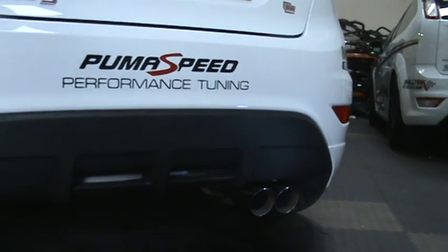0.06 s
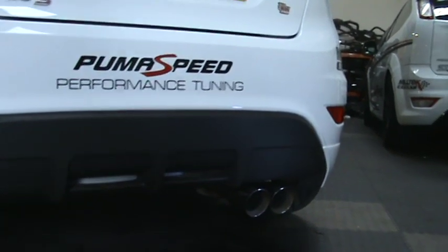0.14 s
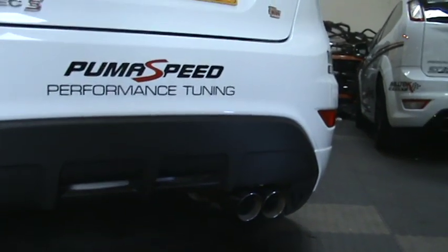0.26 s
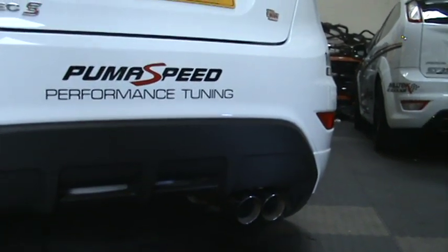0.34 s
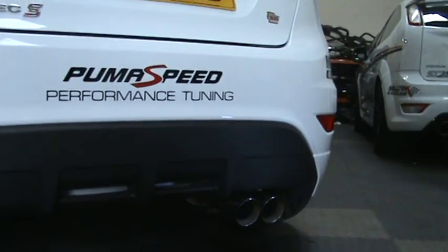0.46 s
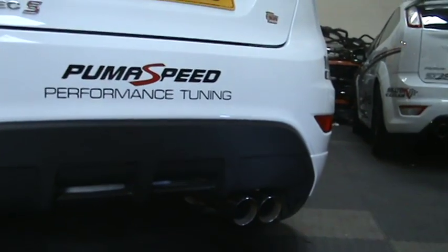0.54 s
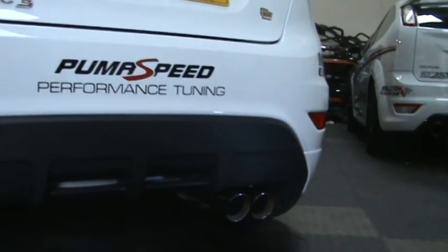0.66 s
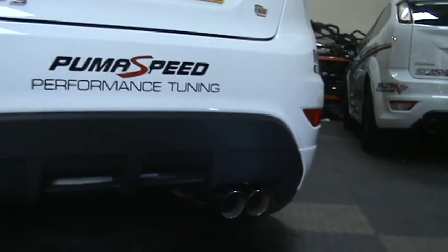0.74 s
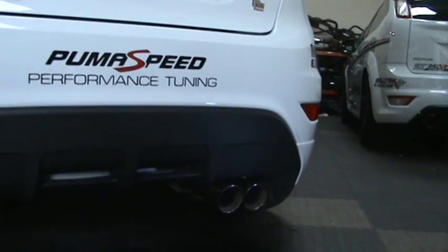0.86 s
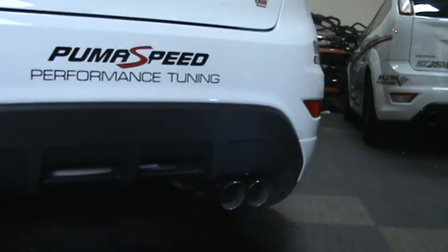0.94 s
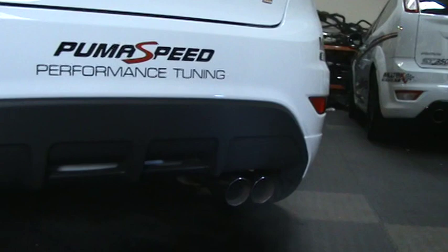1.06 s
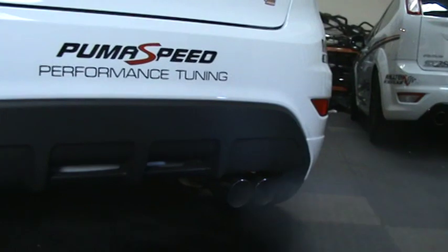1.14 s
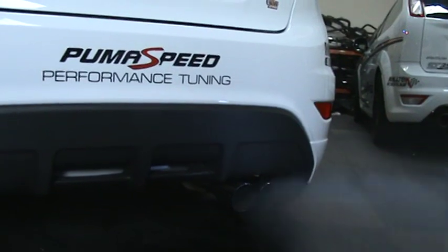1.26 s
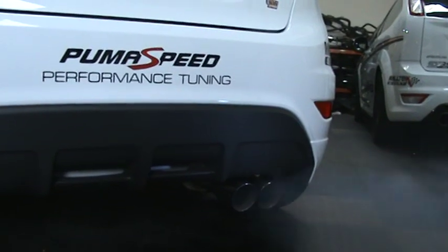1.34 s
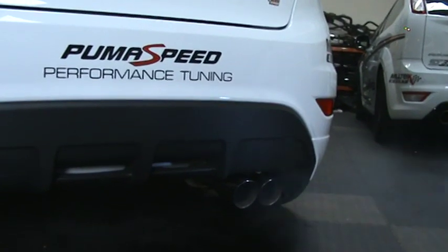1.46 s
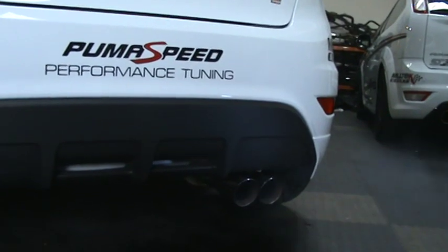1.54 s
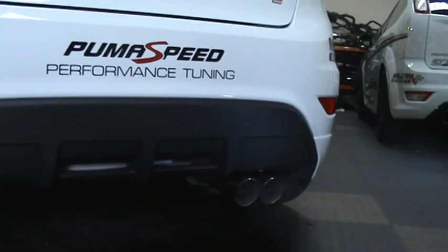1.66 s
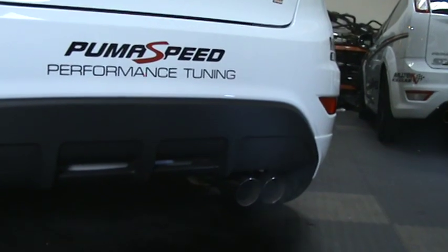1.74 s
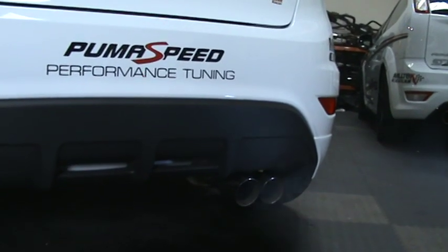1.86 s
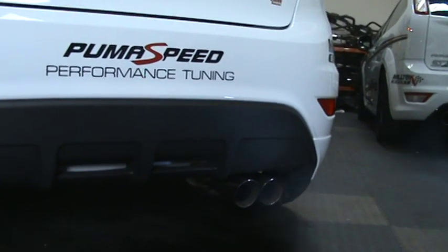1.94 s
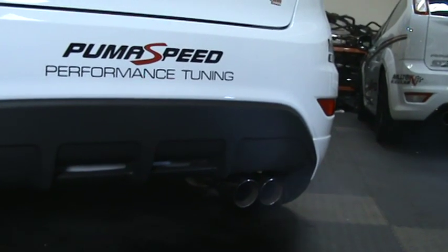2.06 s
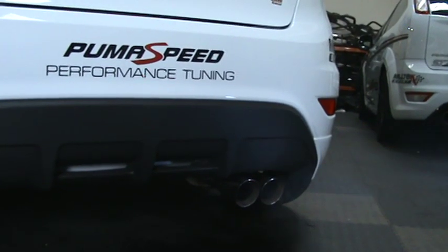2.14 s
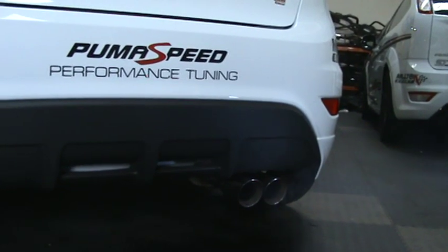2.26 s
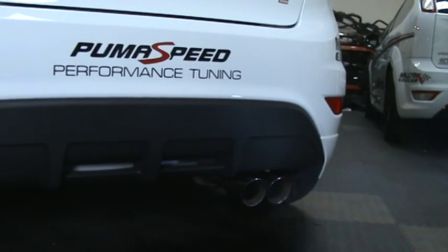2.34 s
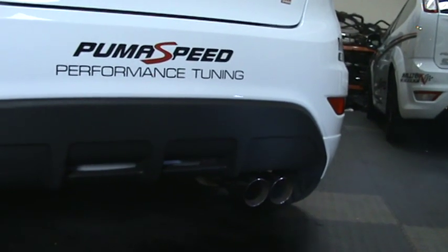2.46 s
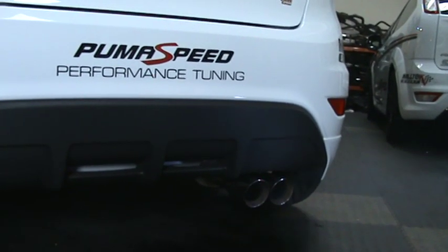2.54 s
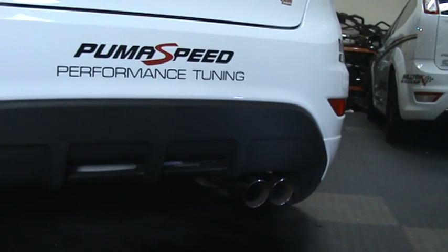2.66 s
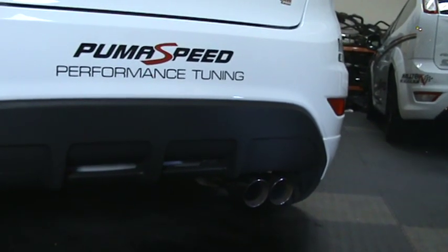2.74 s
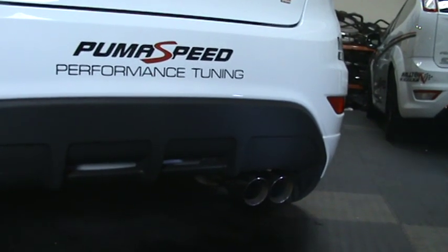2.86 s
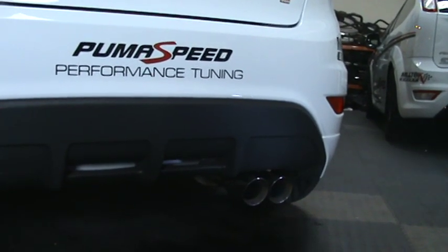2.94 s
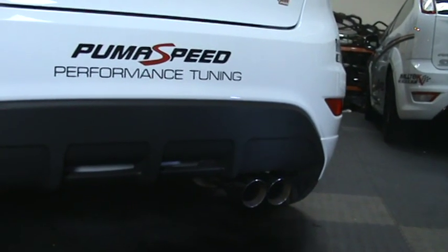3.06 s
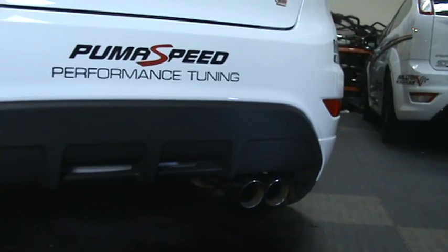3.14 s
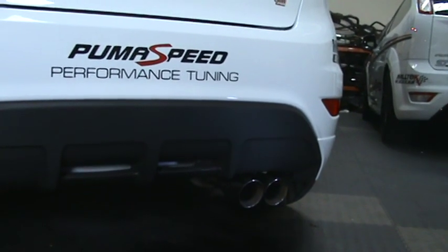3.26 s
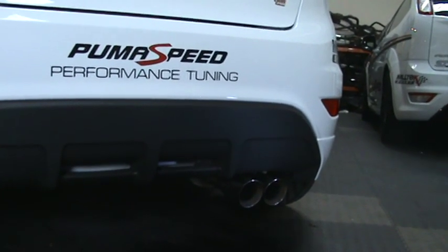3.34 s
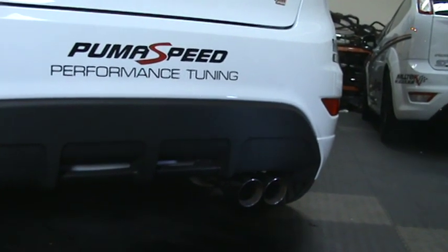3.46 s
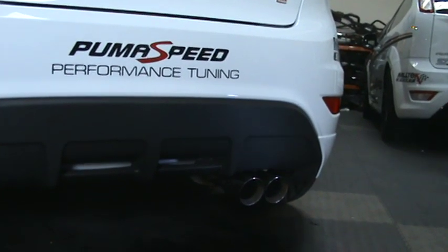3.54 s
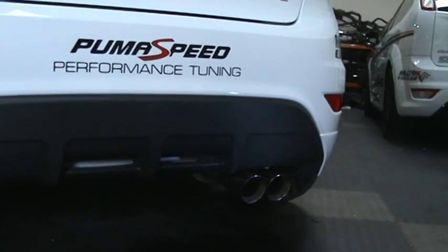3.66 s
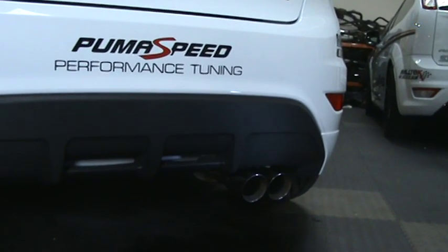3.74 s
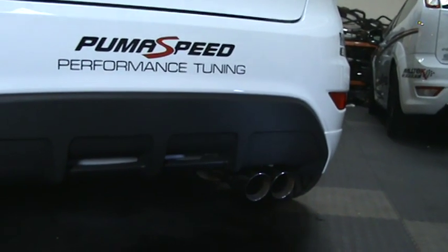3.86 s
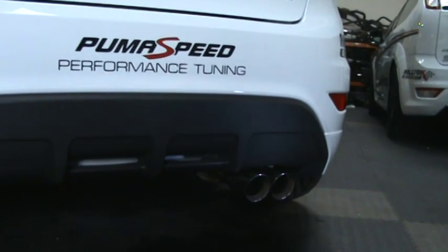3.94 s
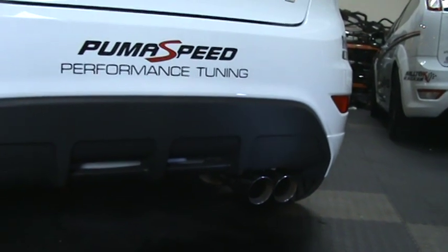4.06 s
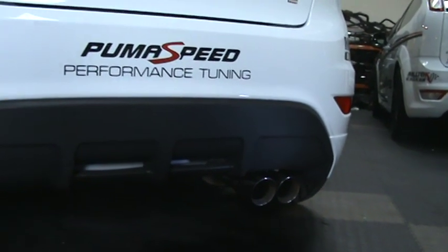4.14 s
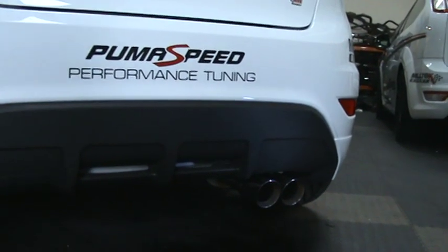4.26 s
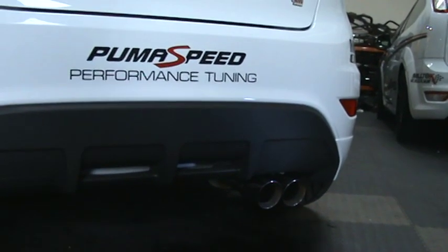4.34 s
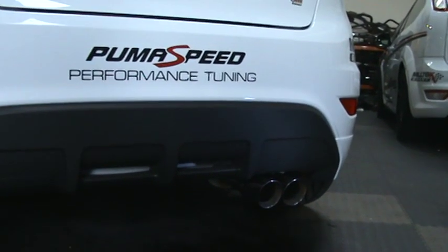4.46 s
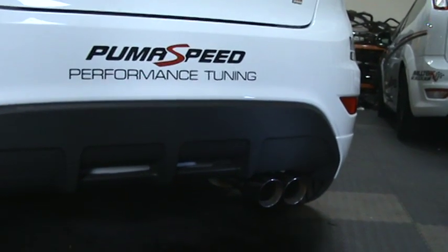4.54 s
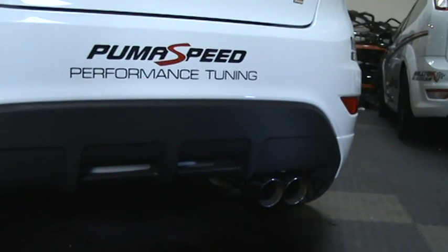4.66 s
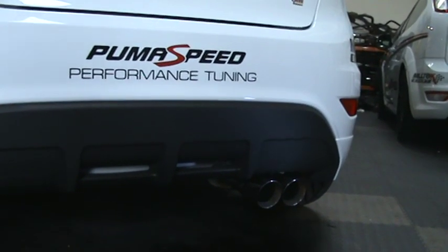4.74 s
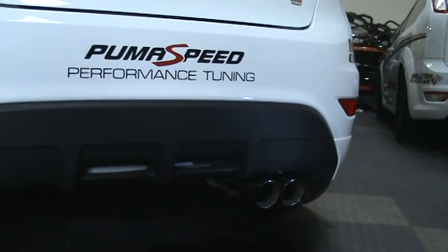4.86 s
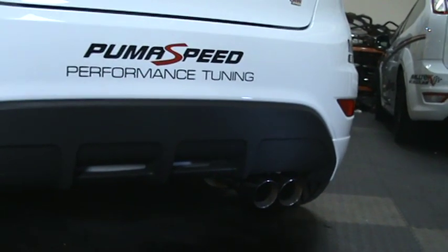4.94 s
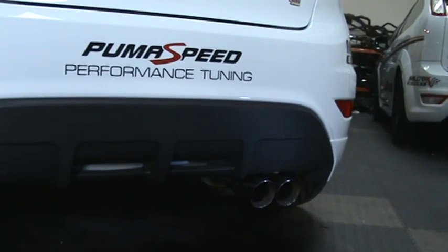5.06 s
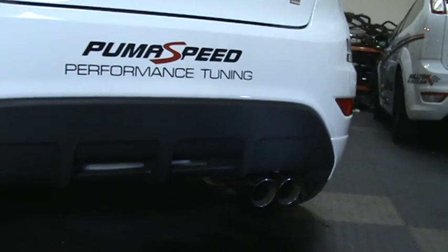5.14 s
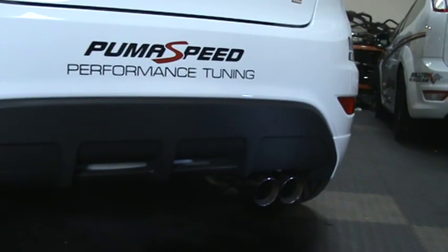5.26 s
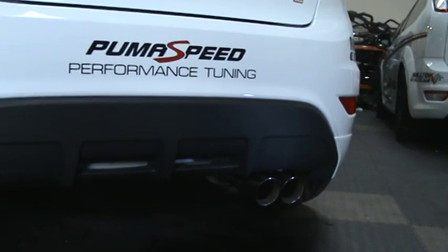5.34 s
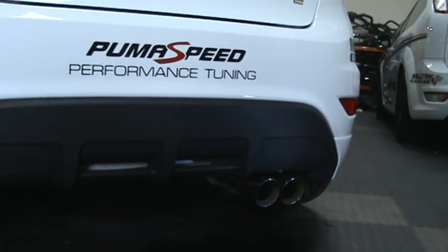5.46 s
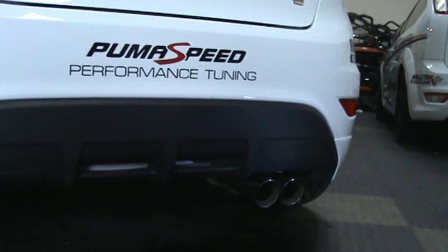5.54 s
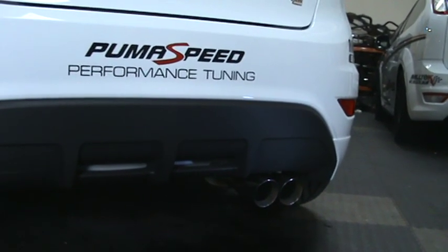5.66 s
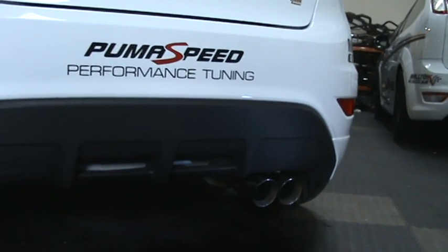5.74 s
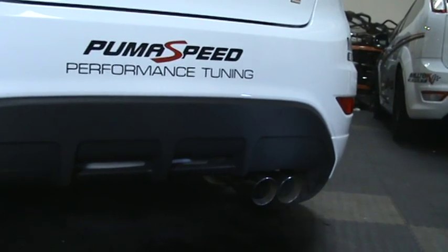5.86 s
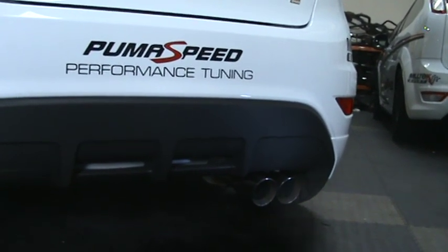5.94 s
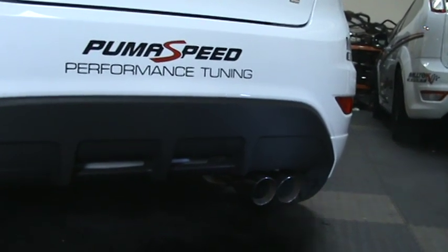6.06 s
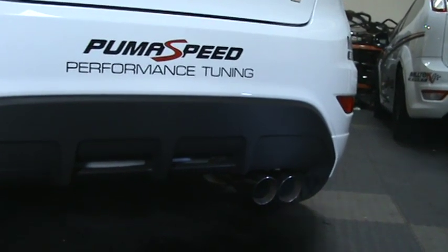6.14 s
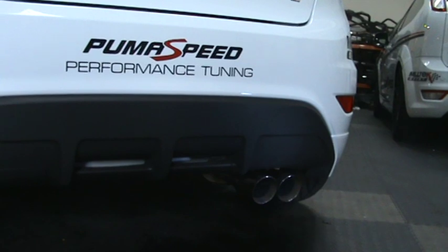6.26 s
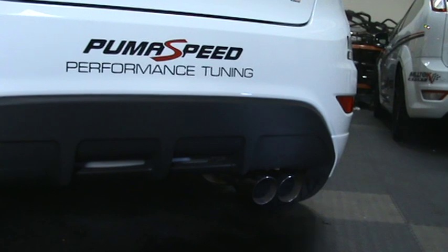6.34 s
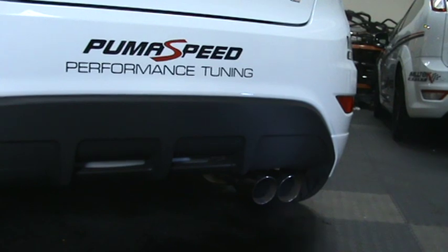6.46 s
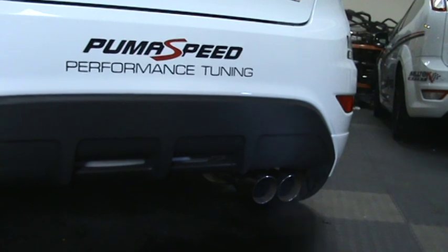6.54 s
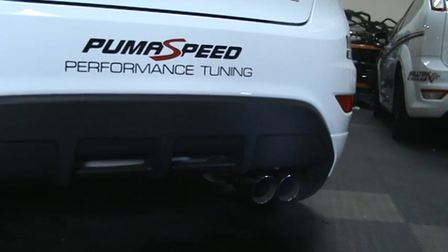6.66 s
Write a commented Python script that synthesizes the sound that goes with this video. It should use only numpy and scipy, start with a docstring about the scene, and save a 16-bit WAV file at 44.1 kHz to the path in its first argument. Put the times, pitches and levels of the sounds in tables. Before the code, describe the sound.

A four-cylinder petrol engine runs down, is blipped to a loud raspy peak, pops and burbles down to quiet idle, then is blipped again.

```python
"""Car with a sport exhaust

A four-cylinder petrol car in a workshop, heard from behind the tail pipes. It runs down, is blipped up to
a high raspy speed, pops and burbles down to idle, then is blipped again and ends while slowing down.
The note is a stack of multiples of the firing rate; burble and pop thumps are blows that ring the pipes.
Clatter, gas jet, rasp, pop cracks and whistle are shaped noise; a short hall answers the cracks.
"""
import sys
import numpy as np
from scipy import signal
from scipy.fft import rfft, irfft, next_fast_len
from scipy.io import wavfile
from scipy.ndimage import map_coordinates

SR = 44100
rng = np.random.default_rng(int(sys.argv[2]) if len(sys.argv) > 2 else 0)


def bounce(signal):
    """Save signal as a 16-bit WAV file at the path given by the first command-line argument."""
    frames = np.transpose(np.atleast_2d(signal))
    limited = np.clip(frames, -1, 1)
    pcm = np.round(limited * 32767).astype(np.int16)
    wavfile.write(sys.argv[1], SR, pcm)


N = 295896  # length in samples


def amp(db):
    """Gain of a level in dB."""
    return 10 ** (np.asarray(db) / 20)


def unit(x):
    """Scale a sound to an rms of 1."""
    return x / np.sqrt(np.mean(x ** 2) + 1e-20)


def along(points, hz):
    """Read a curve of (Hz, value) points on a log frequency axis."""
    f, v = np.transpose(points)
    return np.interp(np.log(hz + 1), np.log(f + 1), v)


def curves(rows):
    """Join the rows over time: one value per sample for each column after the time."""
    seconds, *columns = np.transpose(rows)
    return [np.interp(np.arange(N) / SR, seconds, column) for column in columns]


def by_speed(rows, rate):
    """Look up the rows by firing rate: one value per sample for each column after the rate."""
    hz, *columns = np.transpose(rows)
    return np.array([np.interp(rate, hz, column) for column in columns])


def ramp(start, length):
    """A straight rise: 0 before start, 1 after start + length, both in seconds."""
    return np.clip((np.arange(N) / SR - start) / length, 0, 1)


def wobble(rate):
    """A smooth random curve with this many random points a second."""
    knots = rng.standard_normal(int(N * rate / SR) + 4)
    return map_coordinates(knots, [np.arange(N) * rate / SR])


def filtered(x, response):
    """Multiply the spectrum of x by a complex response of frequency."""
    m = next_fast_len(N + SR // 2)  # spare room so that ringing does not wrap round
    return irfft(rfft(x, m) * response(np.fft.rfftfreq(m, 1 / SR)), m)[..., :N]


def causal(points):
    """The response with this spectrum that rings only after the blow (minimum phase)."""
    grid = np.linspace(0, SR / 2, 2 ** 15 + 1)
    cepstrum = irfft(np.log(amp(along(points, grid)) + 1e-4))
    half = len(cepstrum) // 2
    cepstrum[1:half] *= 2
    cepstrum[half + 1:] = 0
    response = np.exp(rfft(cepstrum))
    return lambda hz: np.interp(hz, grid, response)


def dying(x, t60):
    """Turn each impulse into a sudden rise and an exponential fall of 60 dB in t60 seconds."""
    return signal.lfilter([1], [1, -amp(-60 / (t60 * SR))], x)


# How alike left and right are in the noises. Each row: frequency in Hz, likeness (1 is the same).
LIKENESS = [(300, 1), (700, 0.52), (1500, 0.86), (5000, 0.88), (15000, 0.82)]


def rush(spectrum, shape):
    """Stereo noise of rms 1 under the envelope shape, with left and right partly alike."""
    turn = lambda hz: np.arccos(np.clip(along(LIKENESS, hz), -1, 1)) / 2
    pair = rng.standard_normal((2, N)) * shape
    mid, side = filtered(pair, lambda hz: causal(spectrum)(hz) * [np.cos(turn(hz)), np.sin(turn(hz))])
    return unit(np.array([mid + side, mid - side]))


# How fast the engine turns. Each row: time in seconds, firings per second in Hz.
ENGINE_SPEED = [(0, 73.8), (.27, 71.5), (.43, 64.55), (.62, 54.8), (.8, 51.9), (.83, 58.1), (.91, 73.86),
                (1.03, 102.7), (1.09, 123.5), (1.19, 153.2), (1.24, 162.9), (1.31, 170.9), (1.4, 174.1),
                (1.66, 162.1), (1.92, 144.8), (2.15, 129.8), (2.49, 107.9), (2.8, 91.97), (3.07, 79.92),
                (3.37, 63.82), (3.55, 52.85), (4.18, 39.12), (4.47, 36.47), (4.73, 35.1), (5.45, 34.6),
                (5.55, 35.53), (5.624, 43.24), (5.73, 62.67), (5.782, 75.9), (5.876, 98.5), (5.982, 121.8),
                (6.064, 127.3), (6.12, 130.1), (6.2, 126.5), (6.414, 115.2), (6.71, 100.1)]


def firings():
    """Firing rate with a slight wobble, running count of firings and the sample of each one."""
    rate = curves(ENGINE_SPEED)[0] * (1 + 0.00416 * wobble(25))
    turns = np.cumsum(rate) / SR
    return rate, turns, np.flatnonzero(np.diff(np.floor(turns)))


# Throttle blips. Each row: time it opens in seconds, time it shuts in seconds.
THROTTLE_BLIPS = [(.78, 1.355), (5.57, 6.03)]
OPENING_S, CLOSING_S = 0.041, 0.18  # how long the note takes to follow the throttle


def throttle(lead, opening, closing):
    """Throttle opening, 0 to 1, as a sound follows it: lead, rise and fall times in seconds."""
    return sum(ramp(opens - lead, opening) - ramp(shuts, closing) for opens, shuts in THROTTLE_BLIPS)


# Sound with the throttle open. Each row: firing rate in Hz, strength of the four lowest multiples in dB
# against the silencer's level, then relative dB for higher multiples, burble, engine bay, gas jet, rasp.
OPEN_THROTTLE = [(40.26, -0.5, -22.5, -33, -46, -59, -53), (49.7, -5, -20.5, -31, -43, -49, -48),
                 (61.5, 1.5, -18.5, -22.5, -39, -49, -40.5), (81, -1, -14, -22, -37, -46.5, -44),
                 (94, -0.5, -14.5, -24, -35, -52, -46), (108, -1.5, -22, -37, -34.5, -45, -28),
                 (118, -1.5, -22.5, -41, -30, -37.5, -31.5), (148, -1.5, -23.5, -36, -33, -39.5, -33.5),
                 (180.9, -1.5, -19, -30, -26, -33, -29.5)]
# Note with the throttle shut. Each row: firing rate in Hz, first to fourth multiple in dB against the
# silencer's level, then higher multiples and burble in relative dB.
SHUT_THROTTLE_NOTE = [(41.85, -14, -21, -37, -35, -42, -40), (46.7, -9, -22, -18.5, -23, -41, -31.5),
                      (55.4, -10, -16.5, -17, -34, -37, -32), (70.3, -10, -9.5, -12.5, -36, -37, -30),
                      (78.7, -4, -24, -10, -15, -34.5, -23.5), (85, 0.5, -8, -6, -23.5, -47, -39),
                      (94.15, -0.5, -9, -14, -13.5, -37, -47), (106.36, -2.5, -12, -16, -29.5, -66, -35),
                      (129.65, 4, -4.5, -11, -1, -26.5, -33), (144.8, 3, 0, -5.5, -11, -23.5, -32),
                      (166.6, -1.5, -5.5, -0.5, -6.5, -29.5, -38), (173, 3, -15, 5.5, -19, -28, -41)]
# What the silencer lets through of the four lowest multiples. Each row: frequency in Hz, level in relative dB.
SILENCER_LEVEL = [(40, -28), (58, -24), (75, -20), (100, -15), (116, -16.5), (125, -22), (147, -15.5),
                  (174, -19.5), (205, -21), (240, -30.5), (300, -22.5), (335, -20), (400, -18.5),
                  (450, -24), (500, -35.5), (700, -30.5)]
# The note stumbles. Each row: middle in seconds, half length in seconds, change at the middle in dB.
NOTE_STUMBLES = [(0.058, 0.052, -18), (1.405, 0.045, -14), (1.545, 0.048, -9), (2.211, 0.036, -0.5),
                 (3.179, 0.021, -21), (6.125, 0.066, -5), (6.196, 0.026, -6)]
# Idle. Each row: time in seconds, then relative dB for the first to fourth multiple, the higher
# multiples and the burble.
IDLE_LEVELS = [(4.18, -37, -52, -48, -45.5, -46, -50), (4.47, -30, -46, -43, -39, -44.5, -52),
               (4.73, -36.5, -49, -49, -38, -46.5, -52), (5.1, -38, -44, -44, -34, -45, -48),
               (5.45, -35, -41, -44.5, -33.5, -45.5, -57)]
IDLE_HZ, IDLE_BLEND_HZ = 39.5, 2.7  # full idle at and below the first, blended in over the second above it
NOTCH_HZ, NOTCH_WIDTH_HZ, NOTCH_DB = 115.6, 1.6, -8  # the note thins near this rate, throttle shut


def levels():
    """Levels in dB of the four lowest multiples, the higher ones and the burble, from speed and throttle."""
    rate, t = curves(ENGINE_SPEED)[0], np.arange(N) / SR
    opened = throttle(0, OPENING_S, CLOSING_S)
    strength_db, high_db, burble_db = by_speed(OPEN_THROTTLE, rate)[:3]
    open_db = np.array([strength_db] * 4 + [high_db, burble_db])
    running = opened * open_db + (1 - opened) * by_speed(SHUT_THROTTLE_NOTE, rate)
    notch_db = (1 - opened) * NOTCH_DB * np.exp(-((rate - NOTCH_HZ) / NOTCH_WIDTH_HZ) ** 2)
    stumble_db = sum(db * np.clip(1 - abs(t - s) / half, 0, 1) for s, half, db in NOTE_STUMBLES)
    running[:4] += [along(SILENCER_LEVEL, k * rate) + notch_db + stumble_db for k in range(1, 5)]
    idling = (1 - opened) * np.clip((IDLE_HZ + IDLE_BLEND_HZ - rate) / IDLE_BLEND_HZ, 0, 1)
    return idling * np.array(curves(IDLE_LEVELS)) + (1 - idling) * running


def outlet(hz):
    """A pressure pulse leaves the pipe; an inverted copy follows after a trip back and forth in the tail pipe."""
    return np.exp(-2j * np.pi * hz * .0012) * (1 - .8 * np.exp(-2j * np.pi * hz * .0039))


# Tail pipe resonances that colour the higher multiples. Each row: frequency in Hz, level in relative dB.
TAIL_PIPES = [(170, -2.5), (210, -6.5), (245, -20), (310, -9.5), (400, -0.5), (460, -6.5), (520, -13),
              (600, -24), (700, -9), (780, -13), (860, -11.5), (1000, -14.5), (1400, -16.5), (1750, -10.5),
              (2500, -11), (3000, -40)]


def note(rate, turns, level_db):
    """Even firing makes multiples of the firing rate, timed by the outlet; the tail pipes colour high ones."""
    *low_db, high_db, _ = level_db
    tone = 0
    for k in range(1, 21):
        if k <= len(low_db):
            db = low_db[k - 1] + 0.69 * wobble(20)
        else:  # the higher the multiple, the weaker; all of these are less steady
            weaker_db = np.minimum(1.9, 200 / rate) * (k - len(low_db))
            db = high_db + along(TAIL_PIPES, k * rate) - weaker_db - 3.5 + 4 * wobble(30)
        tone = tone + amp(db) * np.cos(2 * np.pi * k * turns + np.angle(outlet(k * rate)))
    return np.sqrt(2) * tone


# Bursts of burble. Each row: time of the peak in seconds, level in relative dB, time to fall 60 dB in seconds.
BURBLE_BURSTS = [(.3, -22, 0.54), (.47, -34, .6), (1.355, -20, 0.73), (3.07, -22.5, 0.68), (3.27, -20, .8),
                 (4.1, -37, .5), (6.03, -23, 1)]
BURST_RISE_S = 0.041


def unevenness(burble_db):
    """Gain of the burble: what speed and throttle give, with the bursts added in power."""
    t = np.arange(N) / SR
    power = amp(burble_db) ** 2
    for s, db, t60 in BURBLE_BURSTS:
        fall_db = 60 * np.clip(t - s, 0, None) / t60
        power = power + (amp(db - fall_db) * ramp(s - BURST_RISE_S, BURST_RISE_S)) ** 2
    return np.sqrt(power)


# Unburnt fuel going off in the pipe. Each row: time in seconds, crack in relative dB, thump in relative dB.
FUEL_POPS = [(0.297, -48, -21), (0.326, -46, -18), (0.356, -48, -16.5), (0.468, -47, -27),
             (0.5347, -45, -17), (1.3472, -18.5, -18), (1.3555, -33, -29), (1.382, -20, -22),
             (3.0693, -21.5, -8), (3.1698, -38, -19), (3.2669, -45, -12.5), (3.2892, -19.5, -10),
             (3.3673, -43, -12), (3.5183, -33, -14), (3.5348, -49, -19), (3.6222, -42, -25),
             (3.6778, -38.5, -20), (4.0996, -59, -37), (5.6165, -29, -21), (5.6956, -30, -7),
             (6.044, -19, -5)]
# How the exhaust system rings under the burble. Each row: frequency in Hz, level in relative dB.
EXHAUST_SYSTEM = [(13, -33), (22, -7.5), (113, -3), (141, 9.5), (197, -11), (237, -30), (271, -32),
                  (325, -53), (385, -3), (418, -34), (486, -76.5), (657, -52), (844, -60), (903, -102),
                  (1200, -25), (1560, -91), (2640, -120)]


def burble(rate, at, burble_db):
    """Each firing is stronger or weaker than the mean and rings the system; pops are single round blows."""
    blows, thumps = np.zeros(N), np.zeros(N)
    blows[at] = rng.uniform(-1, 1, N // 100)[:len(at)] / np.sqrt(rate[at])
    for s, _, thump_db in FUEL_POPS:
        thumps[round(s * SR)] = amp(thump_db)
    rounded_outlet = lambda hz: outlet(hz) / (1 + 1j * hz / 300) ** 3  # treble taken off above 300 Hz
    peak = np.abs(filtered(np.eye(1, N)[0], rounded_outlet)).max()
    ringing = unit(filtered(blows, causal(EXHAUST_SYSTEM)))
    return unevenness(burble_db) * ringing + filtered(thumps, rounded_outlet) / peak


# Noises with the throttle shut. Each row: firing rate in Hz, then engine bay, gas jet and rasp in relative dB.
SHUT_THROTTLE_NOISE = [(36.9, -50, -106, -77), (50.9, -46.5, -59, -78), (56.3, -45, -56.5, -65),
                       (75.6, -43, -57, -55.5), (90.6, -40.5, -58.5, -46), (117.93, -34.5, -62, -58),
                       (130, -32, -46.5, -51.5), (135.5, -31, -46, -34.5), (145.4, -30.5, -39, -38),
                       (149.2, -29.5, -45, -40.5), (152, -30.5, -37.5, -37), (182, -25, -43, -34.5)]
FLOW_LEAD_S, FLOW_OPENING_S, FLOW_CLOSING_S = 0.039, 0.035, 0.18  # gas flow starts before the note
SPIT_DELAY_S = 0.21
RUNDOWN_DB, RUNDOWN_S = 5.5, 0.53  # extra engine bay noise still dying down from an earlier blip


def noise_levels():
    """Opening for the gas flow, and levels in dB of engine bay, jet and rasp, from speed and throttle."""
    rate = curves(ENGINE_SPEED)[0]
    opened = throttle(FLOW_LEAD_S, FLOW_OPENING_S, FLOW_CLOSING_S)
    shut_db = by_speed(SHUT_THROTTLE_NOISE, rate)
    for _, shuts in THROTTLE_BLIPS:  # the fronts only steepen again a while after the throttle has shut
        shut_db[2] -= 22 * (ramp(shuts, .01) - ramp(shuts + SPIT_DELAY_S, 0.026))
    bay_db, jet_db, rasp_db = opened * by_speed(OPEN_THROTTLE, rate)[3:] + (1 - opened) * shut_db
    bay_db = bay_db + RUNDOWN_DB * np.exp(-np.arange(N) / SR / RUNDOWN_S)
    return opened, bay_db + 3.5, jet_db + 3.5, rasp_db


# Colour of the engine clatter. Each row: frequency in Hz, level per Hz in relative dB.
BAY_COLOUR = [(120, -48.5), (200, 5), (280, 0.5), (350, 7), (385, 4), (430, 3), (520, -4), (630, -4),
              (800, -6), (1100, -7.5), (1400, -9.5), (2300, -9), (2700, -11.5), (3300, -14.5),
              (4500, -19.5), (7000, -20.5), (10500, -28.5), (14000, -41.5)]


def engine_bay(turns, bay_db):
    """Engine clatter: noise that swells slightly once a firing."""
    return amp(bay_db + 0.63 * wobble(30)) * rush(BAY_COLOUR, 1 + 0.053 * np.cos(2 * np.pi * turns))


# Colour of the gas jet. Each row: frequency in Hz, level per Hz in relative dB.
JET_COLOUR = [(1200, -30), (1800, -5), (2500, -3), (3300, -22), (4100, -2), (4900, 0), (5500, -3),
              (6000, -12), (6600, -7), (7500, -15), (11000, -16), (16000, -26)]


def gas_jet(turns, jet_db):
    """Hiss of the gas leaving the pipe, puffing slightly once a firing."""
    return amp(jet_db + 1.3 * wobble(29)) * rush(JET_COLOUR, 1 + 0.082 * np.cos(2 * np.pi * turns))


# Pulse fronts with the throttle open. Each row: frequency in Hz, level per Hz in relative dB.
RASP_COLOUR = [(1000, -10), (2300, -16), (2700, -1), (3300, -22), (3900, 2), (5000, 5), (7500, 3),
               (9000, 5), (11000, 5.5), (12500, 6), (13700, 5), (14700, -8), (16000, 5.5)]
# Pulse fronts with the throttle shut. Each row: frequency in Hz, level per Hz in relative dB.
SPIT_COLOUR = [(1500, -32), (4000, -1), (6000, -5), (6900, 4.5), (8000, -5.5), (10000, 1), (11500, -4),
               (13000, -6), (16000, -4.5)]
# One number for each cylinder in turn: strength of its front with the throttle shut, in relative dB.
CYLINDER_STRENGTH = [6, -6, -1, -3]
# The rasp flares. Each row: start in seconds, length before it fades in seconds, level in relative dB.
RASP_FLARES = [(.95, 0.041, -37), (1.477, 0.0098, -36), (1.508, 0.041, -29.5), (2.158, .012, -36),
               (5.83, 0.027, -35.5)]


def pulse_fronts(rate, at, opened, rasp_db):
    """Steep pulse fronts tear at the pipe's end: an even rasp when open, mostly a ragged spit when shut."""
    scatter = rng.standard_normal(N // 100)[:len(at)]
    even, ragged = np.zeros((2, N))
    even[at] = amp(1.5 * scatter)
    ragged[at] = amp(np.resize(CYLINDER_STRENGTH, len(at)) + 2.2 * scatter)
    ragged *= np.clip((rate - 85) / 40, .15, 1)  # the fronts flatten out at low speed
    rasp = rush(RASP_COLOUR, dying(even, .013) + .17)
    spit = rush(SPIT_COLOUR, dying(ragged, .008) + .15)
    flare = sum(amp(db) * (ramp(s, 0.0014) - ramp(s + length, 0.012)) for s, length, db in RASP_FLARES)
    share = np.clip(0.25 + opened, 0, 1)  # power share of the even rasp
    return np.hypot(amp(rasp_db), flare) * (np.sqrt(share) * rasp + np.sqrt(1 - share) * spit)


# Colour of the pop cracks. Each row: frequency in Hz, level per Hz in relative dB.
CRACK_COLOUR = [(590, -74), (1000, -14), (1560, 4), (2500, 6.5), (3310, -1), (4540, 5.5), (8860, 5),
                (9730, 5), (15400, -7), (16500, 8)]


def cracks():
    """The sharp start of each pop and the hiss of gas after it."""
    starts = np.zeros(N)
    for s, crack_db, _ in FUEL_POPS:
        starts[round(s * SR)] = amp(crack_db)
    shape = dying(starts, 0.023) + 0.17 * dying(starts, 0.35)
    return rush(CRACK_COLOUR, shape) * np.sqrt(np.mean(shape ** 2))


# How long the hall rings. Each row: frequency in Hz, time to fall 60 dB in seconds.
HALL_DECAY = [(300, 0.32), (2000, 0.22), (10000, 0.3)]


def hall(x):
    """The hall's answer is noise in which each frequency dies at its own speed."""
    hz, t, z = signal.stft(rng.standard_normal((2, SR // 2)), SR, nperseg=256)
    fading = z * amp(-60 * t / along(HALL_DECAY, hz)[:, None])
    tail = signal.istft(fading, SR, nperseg=256)[1]
    delayed = np.pad(x, (500, 0))[None]  # 500 samples late
    return signal.fftconvolve(delayed, tail / np.linalg.norm(tail[0]), axes=1)[:, :N]


# A breathy whistle in the treble near full speed. Each row: frequency in Hz, level per Hz in relative dB.
WHISTLE_COLOUR = [(13000, -58), (13500, -3), (13750, 0), (14000, -6), (14500, -60)]
WHISTLE_DB, WHISTLE_FROM_HZ, WHISTLE_FULL_HZ = -39, 130.6, 154.3  # the last two are firing rates


def whistle():
    """Narrow noise that comes in with speed while the throttle is open."""
    rate = curves(ENGINE_SPEED)[0]
    fast = np.clip((rate - WHISTLE_FROM_HZ) / (WHISTLE_FULL_HZ - WHISTLE_FROM_HZ), 0, 1)
    gain = amp(WHISTLE_DB + 2.5 * wobble(25)) * fast * throttle(0, OPENING_S, .02)
    return gain * rush(WHISTLE_COLOUR, 1)


def scene():
    """Note and burble from the pipes, the noises, the pop cracks with the hall behind them, and the whistle."""
    rate, turns, at = firings()
    level_db = levels()
    pipes = amp(1.0) * (note(rate, turns, level_db) + burble(rate, at, level_db[-1]))
    opened, bay_db, jet_db, rasp_db = noise_levels()
    noises = engine_bay(turns, bay_db) + gas_jet(turns, jet_db) + pulse_fronts(rate, at, opened, rasp_db)
    sharp = cracks()
    return pipes + noises + sharp + amp(-14) * hall(sharp[0]) + whistle()


# How far the right microphone port runs ahead of the left. Each row: frequency in Hz, lead in radians.
PORT_LEAD = [(30, .76), (60, 1.05), (140, 1.35), (250, 1.65), (600, 1.5), (1000, 1.04), (1700, .55),
             (3000, .2), (6000, .1), (13000, 0)]
TOP_HZ = 16000


def record(dry):
    """Two close microphone ports shift the bass against each other; peaks are rounded, the band is limited."""
    side = np.array([[-1], [1]])  # left, right
    ports = filtered(dry, lambda hz: amp(0.72 * side) * np.exp(.5j * side * along(PORT_LEAD, hz)))
    rounded = ports / (1 + np.abs(ports / .78) ** 4) ** (1 / 4)
    return filtered(rounded, lambda hz: hz < TOP_HZ)


dry = scene()
out = record(dry)
bounce(out)
```